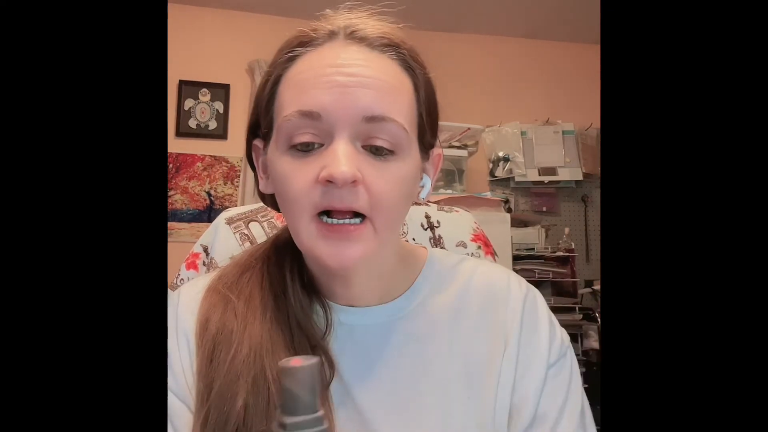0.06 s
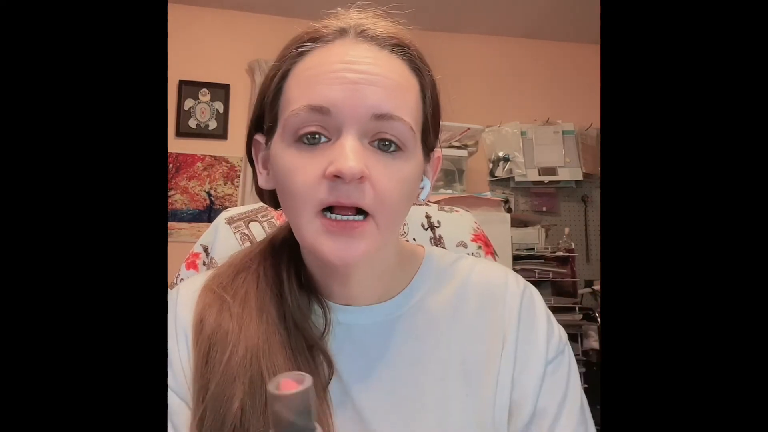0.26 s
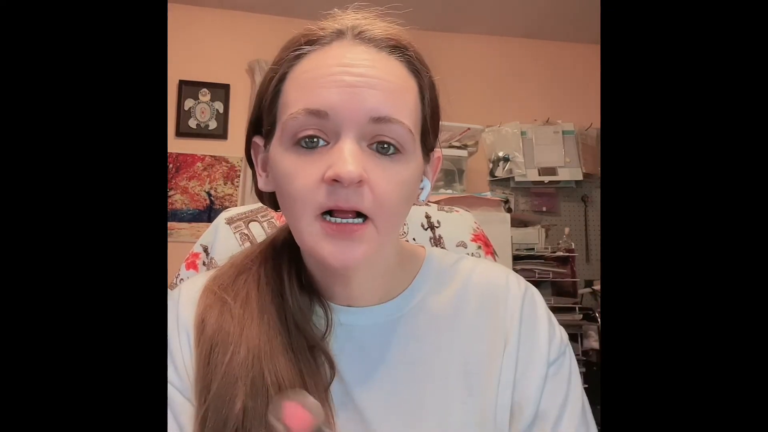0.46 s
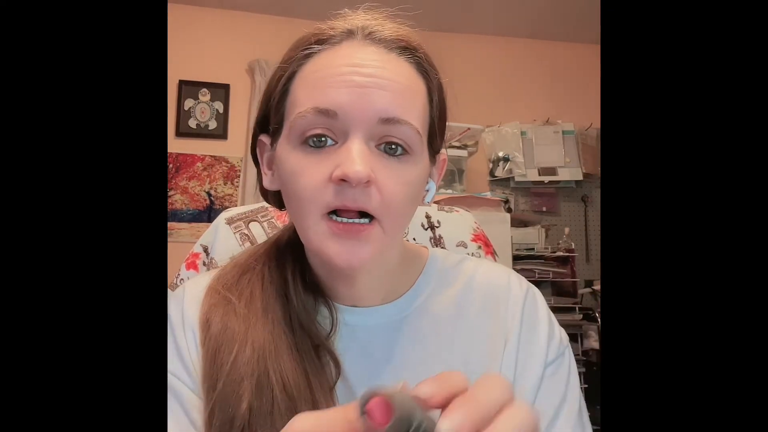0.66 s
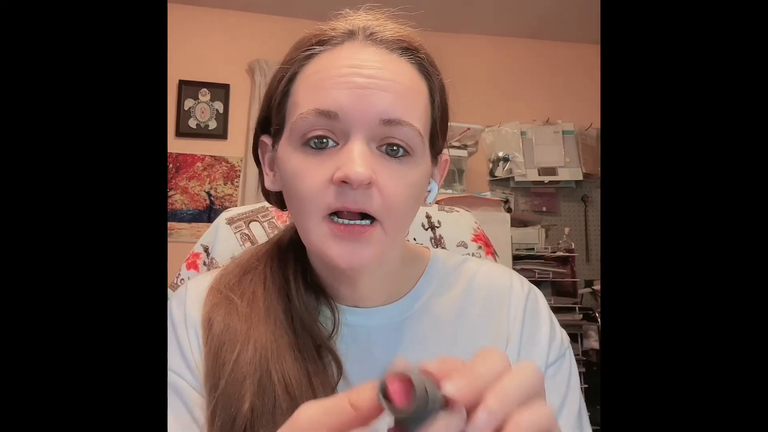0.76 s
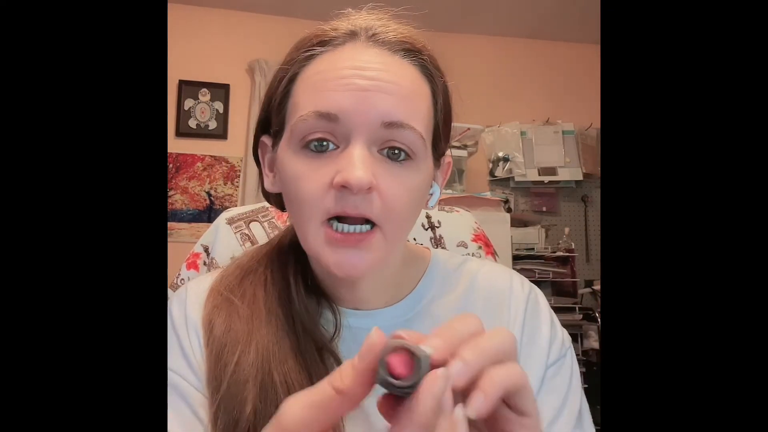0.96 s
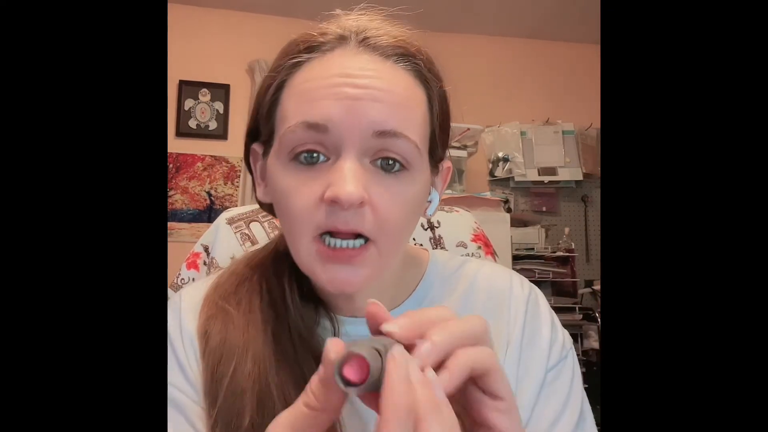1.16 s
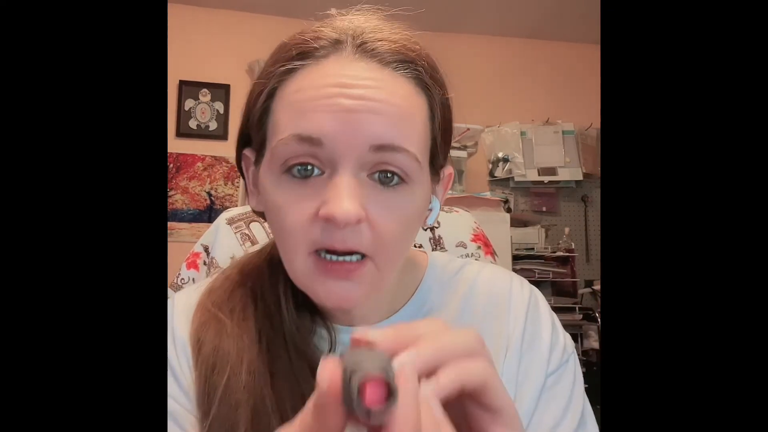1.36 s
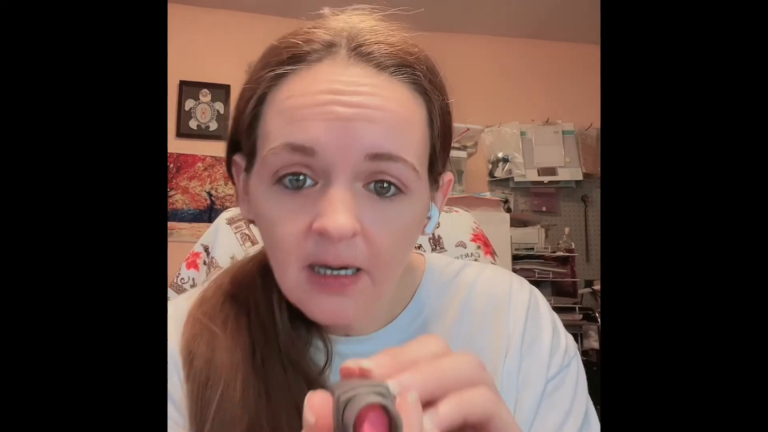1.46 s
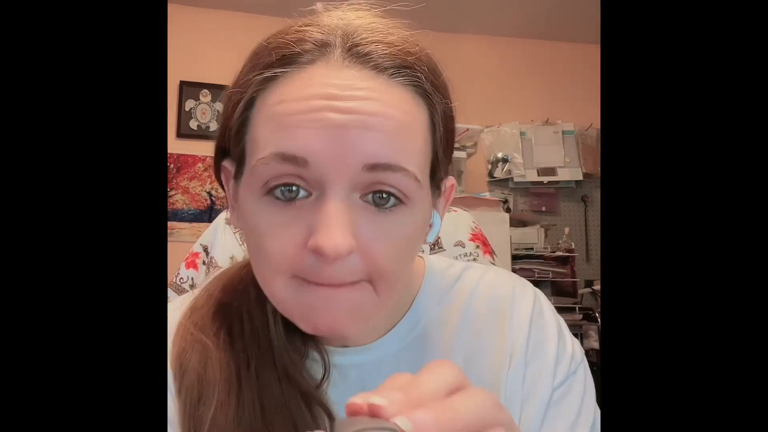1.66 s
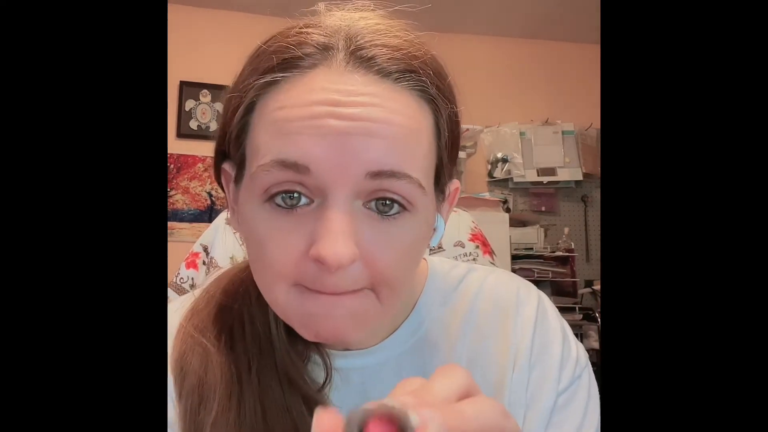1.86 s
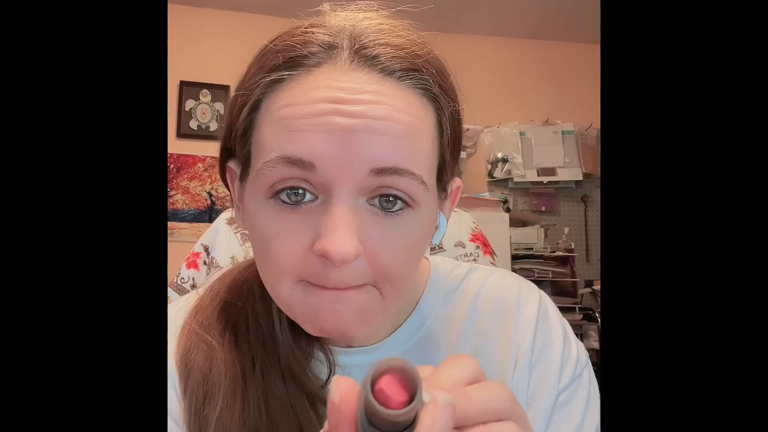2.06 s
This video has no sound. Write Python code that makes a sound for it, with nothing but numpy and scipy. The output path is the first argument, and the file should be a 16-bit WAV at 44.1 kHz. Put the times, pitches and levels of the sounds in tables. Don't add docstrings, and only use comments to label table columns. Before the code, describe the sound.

Close to a phone microphone, a hollow plastic cap snaps off a lipstick tube and knocks once more; faint finger rubs follow, then a cluster of small clacks, scrapes and ratchet ticks in a small soft room.

```python
import sys
import numpy as np
from scipy import signal
from scipy.io import wavfile

SR = 44100
rng = np.random.default_rng(int(sys.argv[2]) if len(sys.argv) > 2 else 0)


def nominal_scale(level):
    x = np.asarray(level, float) / 20
    return 10 ** x


def transcribe(u):
    v = np.clip(np.atleast_2d(u).T, -1, 1)
    q = np.round(v * 32767).astype(np.int16)
    wavfile.write(sys.argv[1], SR, q)


N = 92610
T = np.arange(N) / SR

# start_s, level_db, contact_ms, damping (factor on the ring time)
BLOWS = [
    (0.2226, -17, .05, 1.0),
    (0.2231, -5, .1, 0.8),
    (0.2262, -16, 0.072, 0.6),
    (0.2291, -9.5, .1, 0.57),
    (0.2328, -15, .1, .6),
]


def band(x, hz, q):
    return signal.lfilter(*signal.iirpeak(min(hz, .45 * SR), max(q, .3), fs=SR), x)


def edge(x, hz, kind, order=2):
    return signal.sosfilt(signal.butter(order, hz, kind, fs=SR, output="sos"), x)


def unit(x):
    return x / np.sqrt(np.mean(x ** 2))


def add(y, s, x):
    i = int(s * SR)
    y[i:i + len(x)] += x[:N - i]


def walk(rate):
    return unit(edge(rng.standard_normal(N + SR), rate, "low")[SR:])


def noise_band(n, hz, q):
    return band(band(rng.standard_normal(n), hz, q), hz, q)


def ring(modes, damp=0.94):
    t = T[:SR // 4]
    y = np.zeros(len(t))
    for k, (hz, db, t60) in enumerate(modes):
        fade = nominal_scale(db - 60 * t / (t60 * damp))
        y += (-1) ** k * fade * np.sin(2 * np.pi * hz * t)
    return y


def hiss():
    # pitch_hz, level_db (per Hz)
    air_colour = [(80, -1.5), (105, -11), (160, -6.5), (300, -16), (800, -18.5), (2000, -26), (7000, -32.5),
                  (16000, -48)]
    hz, db = np.array(air_colour).T
    y = np.zeros(N)
    for f in 80 * 2 ** np.arange(0, 7.8, .4):
        level_db = np.interp(np.log(f), np.log(hz), db)
        y += nominal_scale(level_db + 1.8 * walk(11)) * noise_band(N, f, 2.0)
    return nominal_scale(-63.5) * unit(y)


def air_resonances():
    # pitch_hz, q, level_db
    air_modes = [(79.4, 3.8, -67.5), (156, 14, -71.5), (780, 9, -78)]
    return sum(nominal_scale(db) * unit(noise_band(N, hz, q)) for hz, q, db in air_modes)


def hum():
    # multiple, level_db (rms)
    harmonics = [(1, -47), (2, -74), (4, -76), (5, -75.5)]
    motor_hz, wobble_db = 59.2, 0.73
    phase = 2 * np.pi * np.cumsum(motor_hz * (1 + 0.0067 * walk(6.9))) / SR
    y = np.zeros(N)
    for k, db in harmonics:
        sway_db = wobble_db * k ** .5 * walk(17)
        y += np.sqrt(2) * nominal_scale(db + sway_db) * np.sin(k * phase)
    return y


def room(x):
    # pitch_hz, level_db, t60_s
    tail_bands = [(250, -20.5, .4), (496, -18.5, 0.39), (952, -13, 0.25), (2000, -14.5, 0.19),
                  (4000, -18, .2), (7000, -16, .22), (11000, -35.5, .13), (14600, -16.5, .14)]
    wall_s, build_s = 0.0068, 0.013
    t = T[:SR // 2]
    tail = np.zeros(len(t))
    for hz, db, t60 in tail_bands:
        tail += nominal_scale(db - 60 * t / t60) * noise_band(len(t), hz, 0.98) / np.sqrt(t60 * SR / 30)
    return signal.fftconvolve(x, tail * np.clip((t - wall_s) / build_s, 0, 1))[:N]


def rubs(rows, top_hz, squeak_db=-10, squeak_q=19):
    ramp_s, sag_db, grain_db = .003, -4.5, 3
    y = np.zeros(N)
    grit = edge(rng.standard_normal(N) * nominal_scale(grain_db * walk(150)), top_hz, "low", order=6)
    for s, length, db, low_hz, squeak_hz in rows:
        i, n = int(s * SR), int((length + 3 * ramp_s) * SR)
        t, x = T[:n], grit[i:i + n]
        rise, fall = t / ramp_s, (length - t) / (3 * ramp_s) + 1
        shape = np.clip(np.minimum(rise, fall), 0, 1) * nominal_scale(sag_db * t / length)
        rasp = 0.74 * unit(edge(x, low_hz, "high"))
        squeak = nominal_scale(squeak_db) * unit(band(x, squeak_hz, squeak_q))
        add(y, s, nominal_scale(db) * shape * (rasp + squeak))
    return y


def finger_slides():
    # start_s, length_s, level_db, low_edge_hz, squeak_hz
    slides = [(.001, 1.92, -77, 7980, 15040), (1.535, 0.015, -63, 8000, 14000),
              (1.58, .135, -62, 8000, 14000), (1.785, 0.075, -75, 8000, 15000),
              (0.1545, 0.034, -56, 5000, 7760), (.207, .018, -47, 4000, 6700),
              (0.473, 0.036, -66.5, 2578, 6480), (0.528, 0.029, -59, 6000, 8170),
              (0.661, 0.027, -61.5, 4980, 7980), (.695, 0.029, -57.5, 2460, 5580),
              (0.732, 0.047, -53, 5610, 8090), (.785, 0.088, -69, 5000, 6300),
              (1.257, 0.05, -56, 1800, 7830), (1.31, 0.084, -68.5, 4990, 9690),
              (1.47, 0.028, -53.5, 6000, 6546)]
    return rubs(slides, 18000)


def whistles():
    # start_s, length_s, level_db, low_edge_hz, squeak_hz
    whistling = [
        (.74, 0.072, -67, 6000, 8000),
        (.775, 0.096, -70, 4996, 5976),
        (1.04, 0.21, -80, 6000, 8150),
    ]
    return rubs(whistling, 18000, squeak_db=6, squeak_q=14)


def scrapes():
    # start_s, length_s, level_db, low_edge_hz, squeak_hz
    drags = [
        (.03, 0.066, -65, 1440, 3494),
        (1.32, 0.14, -63, 2000, 4000),
        (1.47, 0.053, -48.5, 2000, 6470),
        (1.54, 0.034, -46, 1450, 3740),
        (1.585, 0.041, -40.5, 1330, 6060),
        (1.63, 0.087, -48, 2000, 6340),
        (1.784, 0.044, -55.5, 3200, 7000),
        (1.85, 0.086, -70, 1280, 1800),
    ]
    return rubs(drags, 7650)


def ratchet():
    # start_s, level_db (peak)
    drops = [(1.8112, -52), (1.833, -47), (1.841, -54), (1.8566, -46), (1.862, -51), (1.8676, -52),
             (1.8795, -44.5), (1.886, -51), (1.8987, -45), (1.906, -49), (1.9193, -45.5), (1.937, -47.5)]
    # pitch_hz, level_db, t60_s
    tooth_modes = [(1800, 5, 0.0085), (4010, 3.5, 0.0065), (6000, 2, 0.0029), (9860, -19, 0.0027),
                   (14350, -3, 0.0024)]
    grit = edge(rng.standard_normal(SR // 4), 1500, "high")
    click = ring(tooth_modes) / 2 + nominal_scale(-20 - 13000 * T[:SR // 4]) * grit
    y = np.zeros(N)
    for s, db in drops:
        add(y, s, nominal_scale(db) * click)
    return y


def ticks():
    # start_s, level_db (peak), ring_hz, chatter_ms
    contacts = [(0.0473, -45, 3300, 3.1), (.3456, -51, 7020, 3), (0.3588, -40, 1688, 9.1),
                (1.0085, -53.5, 3190, 3), (1.031, -51, 7840, 1.9), (1.4632, -41, 4050, 2.8),
                (1.4635, -41, 2314, 5.2), (1.4627, -33, 7500, 3), (1.5344, -32, 3950, 3.4),
                (1.545, -34.5, 3480, 3.7), (1.554, -52, 4930, 3.8), (1.5779, -27, 2600, 5.1),
                (1.5772, -28.5, 1710, 9.4), (1.579, -40.5, 390, 33), (1.5915, -31, 2930, 5.4),
                (1.601, -27, 4550, 4.1), (1.607, -25, 2970, 3.4), (1.612, -34, 4700, 8.5),
                (1.627, -49, 5000, 4), (1.6424, -29, 3570, 3.3), (1.644, -29, 4300, 4),
                (1.6634, -34, 6070, 4), (1.6636, -37, 3530, 3.8), (1.672, -41, 4750, 2.6),
                (1.6845, -33.5, 2870, 2.3), (1.6905, -26.5, 3950, 2.8), (1.701, -36, 2940, 3.8),
                (1.7816, -42, 3500, 4.8), (1.7815, -38.5, 4800, 3.6), (1.7816, -44, 2290, 2.9),
                (2.0131, -51, 3860, 3.1)]
    y, t = np.zeros(N), T[:1500]
    for s, db, hz, ms in contacts:
        burst = rng.standard_normal(len(t)) * nominal_scale(-9 * (t * 1000 / ms) ** 1.17)
        burst[0] += 4
        part = band(band(burst, hz, 1.3), hz, 2.5)
        broad = edge(edge(burst, 7700, "low", order=6), 1370, "high")
        snap = edge(burst, 14000, "high") * nominal_scale(-5 * t * 1000)
        x = unit(part) + nominal_scale(-8) * unit(broad) + nominal_scale(-13) * unit(snap)
        add(y, s, nominal_scale(db) * x / np.abs(x).max())
    return y


def knocks(rows):
    y = np.zeros(N)
    for s, db, hz, t60, ms in rows:
        swell = 1 - np.exp(-T[:SR // 4] * 1000 / ms)
        add(y, s, ring([(hz, db, t60)]) * swell)
    return y


def base_clacks():
    # start_s, level_db, ring_hz, t60_s, contact_ms
    clacks = [(1.4626, -30, 6720, 0.0055, 0.11), (1.4628, -36.5, 5630, 0.02, .2),
              (1.4634, -32.5, 4120, 0.019, 0.72), (1.4634, -35, 2167, 0.015, 0.38),
              (1.5338, -38, 3670, 0.011, 0.25), (1.5771, -27.5, 2030, 0.019, .3),
              (1.5771, -23, 2590, 0.021, 0.19), (1.5773, -38, 895, 0.026, 0.47),
              (1.5773, -28.5, 3160, 0.019, 0.29), (1.5773, -35.5, 4650, 0.019, 0.26),
              (1.5937, -18, 3280, 0.0049, 0.12), (1.5945, -26.5, 4100, 0.0078, .3),
              (1.6075, -24.5, 2950, 0.015, 0.26), (1.6633, -18, 6280, 0.0068, 0.18),
              (1.6633, -25.5, 3510, 0.014, 0.21), (1.6633, -27, 7070, .01, 0.21),
              (1.6634, -30.5, 4310, .01, 0.14), (1.6658, -31, 6360, 0.01, 0.34),
              (1.672, -27, 6000, .008, 0.11), (1.6828, -33, 2460, 0.0069, 0.18),
              (1.6903, -29, 4160, 0.016, .15), (1.6903, -34, 2980, 0.02, 0.077),
              (1.6945, -35, 2950, 0.019, 0.35), (1.7815, -39, 2690, 0.016, 0.17),
              (1.7815, -37.5, 3515, 0.013, .2), (1.7815, -49, 6320, 0.0085, .1),
              (1.7815, -39, 7000, 0.011, .1)]
    return knocks(clacks)


def hand_knocks():
    # start_s, level_db, ring_hz, t60_s, contact_ms
    dull_rows = [(0.2224, -30.5, 15270, .02, .15), (.2228, -30.5, 8906, 0.037, .3),
                 (0.2234, -24, 13200, .015, .15), (.226, -22.5, 780, 0.023, 0.55),
                 (0.227, -37, 134, 0.18, 5.6), (.228, -19, 652, 0.036, 1.2), (.232, -42, 234, 0.21, 5.2),
                 (.243, -29, 6300, .02, 1.2), (0.2563, -14, 1130, 0.021, 0.63),
                 (.2575, -19, 1797, 0.035, .6), (.2576, -27, 2400, .012, .5),
                 (.3456, -43, 7020, 0.026, 0.59), (.3458, -48, 540, .05, 1.2),
                 (.3606, -41.5, 7000, 0.03, .6), (.3608, -44.5, 6340, 0.023, .6),
                 (.364, -41, 570, 0.06, 1.5), (.368, -44.5, 359, 0.084, 1.45),
                 (1.535, -48, 391, 0.032, 1.4), (1.5625, -42, 1350, 0.015, 0.5),
                 (1.598, -43, 138, 0.29, 2.3), (1.608, -39, 540, 0.018, 0.43)]
    return knocks(dull_rows)


def chatter():
    crack_db, crack_t60_s = -8.5, .012
    start_s, length_s, level_db, sag_db = .2232, 0.016, -17, -12.5
    y, t = np.zeros(N), T[:2000]
    crack = edge(rng.standard_normal(len(t)), 3000, "high")
    add(y, BLOWS[0][0], crack * nominal_scale(-60 * t / crack_t60_s + crack_db - 13.5))
    rattle = edge(edge(rng.standard_normal(len(t)), 6500, "low", order=6), 500, "high")
    add(y, start_s, rattle * nominal_scale(level_db + sag_db * (t / length_s) ** 2))
    return y


def cap():
    # pitch_hz, level_db, t60_s
    cap_modes = [(361, -19, 0.096), (575, -11.5, .05), (1218, -4.5, 0.04), (1490.6, -11.5, 0.03102),
                 (1612, -5.5, 0.041), (1815, 1, .036), (1943, -1, 0.03), (2720, -5, 0.021),
                 (3125, -6, 0.024), (3530, -8.5, 0.039), (4280, -13, .02), (5280, -13, 0.017),
                 (6320, -6.5, 0.019), (13200, -22.5, .012)]
    y = np.zeros(N)
    for s, db, ms, damp in BLOWS:
        push = np.hanning(int(ms * SR / 1000) + 3)
        add(y, s, nominal_scale(db) * np.convolve(ring(cap_modes, damp), push / push.sum()))
    return edge(y, 230, "high")


def scene():
    body, rim, dull = cap(), chatter(), hand_knocks()
    small = ticks() + base_clacks() + ratchet() + finger_slides() + scrapes() + whistles()
    sent = small + nominal_scale(-6.5) * body + nominal_scale(7) * rim + nominal_scale(-13) * dull
    floor = hum() + hiss() + air_resonances()
    return (body + rim + dull + small + nominal_scale(4.5) * room(sent) + floor)[None]


def band_limit(x):
    return signal.sosfilt(signal.butter(12, 16960, fs=SR, output="sos"), x)


def record(dry):
    ceiling = 1.9
    x = dry + 0.32 * band(dry, 15300, 5)
    x = ceiling * np.tanh(x / ceiling)
    x = signal.sosfilt(signal.ellip(6, .5, 30, 15900, fs=SR, output="sos"), x)
    return band_limit(x)


dry = scene()
out = record(dry)
transcribe(out)
```